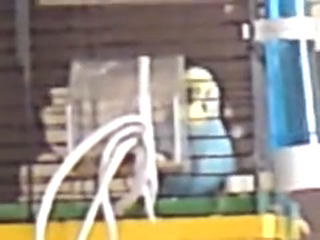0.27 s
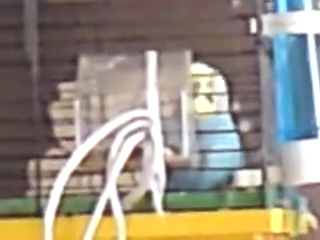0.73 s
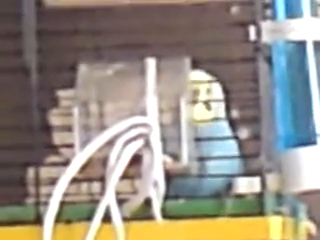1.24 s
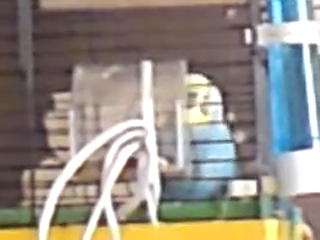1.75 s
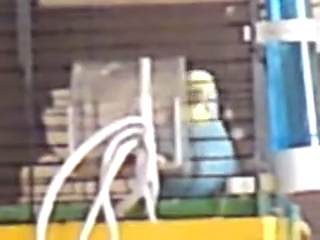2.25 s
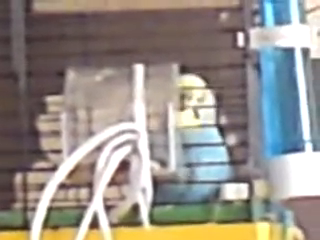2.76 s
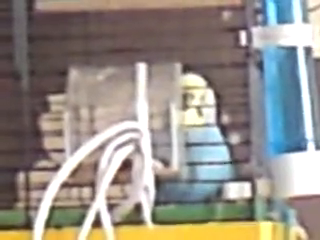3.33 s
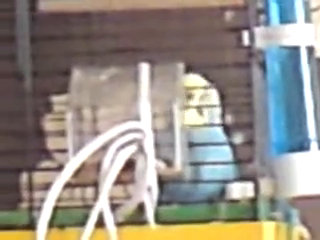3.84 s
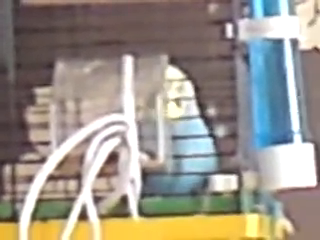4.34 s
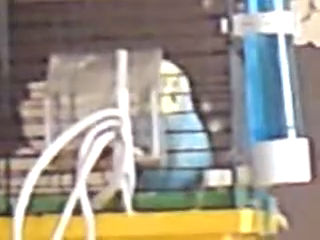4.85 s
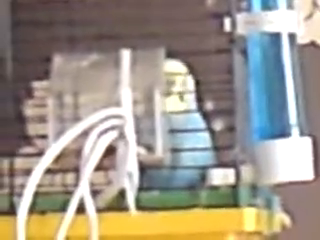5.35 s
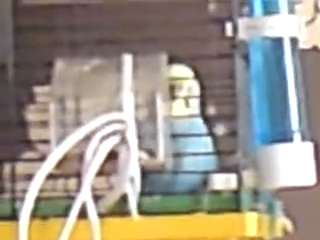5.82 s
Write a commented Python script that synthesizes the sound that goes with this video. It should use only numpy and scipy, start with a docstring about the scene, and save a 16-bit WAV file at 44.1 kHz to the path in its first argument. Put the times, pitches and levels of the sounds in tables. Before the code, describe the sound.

A caged budgerigar chatters indoors with harsh rasps, short rising chirps, buzzy warbles, beak clicks and one sharp whistle, over steady hiss.

```python
"""A harsh rasp is heard first, over low rumble and hiss; then a budgerigar chatters in a cage in a bare room.
Its rasps are noise pulses ringing throat and beak; its whistles, chirps and warbles are sums of harmonics;
its beak clicks, a scrape and a bump are shaped noise. Sparse decaying echoes blur every note, a small
microphone adds hiss, and a gain control lowers the level after loud calls, most after the loudest squawk."""
import sys
import numpy as np
from scipy import signal
from scipy.fft import rfft, irfft
from scipy.io import wavfile
from scipy.ndimage import uniform_filter1d

SR = 44100
rng = np.random.default_rng(int(sys.argv[2]) if len(sys.argv) > 2 else 0)


def wrap_up_sound(samples):
    """Save the sound to the file named by the first command line argument, as 16-bit audio."""
    columns = np.atleast_2d(samples).T
    # keep every value between -1 and 1, then stretch to whole-number steps
    tamed = np.clip(columns, -1, 1)
    steps = np.round(tamed * 32767).astype(np.int16)
    wavfile.write(sys.argv[1], SR, steps)


N = 268524  # samples in the scene

# Source levels are those before the direct path, echoes and gain control act.
# Spectrum of the microphone hiss: [f/Hz, density level/dB per Hz]
HISS_SPECTRUM = [(35, -27), (60, -3), (772, -12), (1350, -15.5), (1470, -15.5), (1880, -13.5), (2270, -17),
                 (3170, -19.5), (3440, -17), (4060, -18.5), (6550, -22.5), (8580, -34.5), (11200, -77),
                 (18900, -120)]
HISS_DB, HISS_DRIFT_DB, HISS_DRIFT_HZ = -48, 0.71, 6.1
# Low resonances of the room: [f/Hz, width/Hz, rms level/dB]
ROOM_HUMS = [(41.2, 6.6, -59.5), (260.5, 95, -58)]

# Rasps: [start t/s, rise t/s, fall t/s, peak level/dB, rise/dB, fall/dB (negative: grows),
# treble over body/dB, throat f/Hz, throat width/Hz, windpipe ring level/dB]
RASP_EVENTS = [(.02, 0.086, 0.033, -23.5, 6.5, 29, -9.5, 1530, 1690, -2),
               (.17, .04, 0.069, -48, 4, 4.5, 9, 1710, 1520, -1),
               (2.488, 0.013, 0.17, -39.5, 3, 8, -25, 1970, 500, -4),
               (2.63, 0.0188, 0.054, -35, 2, 10, -19, 2000, 903, -16),
               (2.74, 0.0075, 0.058, -36, 3, 14, -11, 2000, 1200, -8),
               (2.855, .065, .08, -20, 18.5, 14, 8.5, 2000, 1805, 5.5),
               (3.21, 0.0144, .022, -47.5, 9.5, 17.5, -14.5, 1580, 900, -17.5),
               (3.3, 0.085, 0.071, -47.5, 7, 7.5, -4.5, 1780, 1510, -3),
               (3.5, 0.067, 0.0645, -45, 3, 6, -17, 1900, 1200, 0.5),
               (4.17, 0.0067, 0.095, -38.5, 4.5, 25, -11, 1850, 1010, -12.5),
               (4.295, 0.016, 0.0366, -46, 11, 6, -20, 1460, 1010, -14),
               (4.685, 0.022, 0.052, -39, 3.5, 7.5, -24, 2020, 715, -24.5),
               (4.9, 0.014, 0.31, -49, 1, 4, -12.5, 1680, 1520, 2),
               (5.645, 0.008, 0.079, -41, 6, 3, -20, 2010, 500, -6),
               (5.775, .01, 0.055, -33, 0, 13.5, -26, 2117, 543, -10),
               (5.87, .006, 0.057, -36, 3, 17, -22, 1800, 1300, -12),
               (5.94, 0.035, .02, -43, 3, 14, -13, 1880, 1300, -18),
               (6.045, 0.0097, 0.044, -22, 18, -7, 0, 2200, 1790, 8.5)]
# Upper resonances of the open beak: [f/Hz, width/Hz, level/dB]
BEAK_RESONANCES = [(4650, 1600, -0.5), (5730, 920, -3), (7030, 870, -4)]
# Colour of a rasp leaving the cage: [f/Hz, level/dB]
CAGE_RESPONSE = [(450, -30), (900, -5), (1400, 0), (3500, 0), (3950, -4), (4300, 0), (8000, -4)]
WINDPIPE_HZ, WINDPIPE_WIDTH_HZ = 3050, 800
BRIGHTEN = 0.77  # treble dB gained per dB of effort
PULSES_PER_S = 1500  # mean rate of strong air pulses

# Pips: [start t/s, level/dB, mean f/Hz, length t/s]
PIP_EVENTS = [(0.486, -49, 3174, 0.026), (0.667, -42, 1747, 0.017), (0.916, -41.5, 3190, 0.016),
              (2.314, -36.5, 3243, 0.016), (4.078, -38, 3070, 0.0165), (4.094, -34.5, 3196, 0.028),
              (4.125, -30.5, 2316, 0.025), (4.496, -44, 3278, 0.012), (4.902, -53, 1609, 0.38),
              (5.12, -52, 3040, 0.061), (2.498, -39, 3830, 0.013), (2.535, -50, 3940, 0.012),
              (2.585, -34.5, 3747, 0.012), (2.62, -33.5, 3947, 0.0089), (2.614, -30.5, 2024, 0.014),
              (2.712, -34.5, 3172, 0.024), (2.732, -33, 4170, 0.0038), (2.74, -32.5, 2790, 0.014),
              (2.759, -35, 2014, 0.032), (2.794, -35.5, 2420, 0.031), (5.688, -42, 4000, 0.012),
              (5.745, -32.5, 3780, 0.006), (5.761, -34.5, 4000, 0.018), (5.824, -41.5, 1350, 0.015),
              (5.842, -37, 1560, 0.022), (5.873, -32, 3150, 0.02), (5.89, -35.5, 4220, 0.013),
              (5.904, -29, 2770, 0.015), (5.924, -34.5, 1990, 0.03), (5.954, -31.5, 2445, 0.029)]

# Rising chirps: [start t/s, climb t/s, top t/s, from f/Hz, top f/Hz, level before the tract/dB,
# second harmonic/dB, third harmonic/dB, hoarseness at the top/0-1]
RISE_EVENTS = [(.63, 0.1666, 0.043, 1295, 1828, -25.5, -4, -17.5, 0.18),
               (1.56, .095, .012, 1330, 1598, -43.5, 8.5, -12, 0.15),
               (1.655, 0.0452, 0.068, 1704, 1907, -31, -6.5, -19.5, 0.56),
               (2.008, 0.035, .008, 1390, 1578, -46.5, 11.5, -9.5, 0.12),
               (2.2, 0.091, 0.065, 1400, 1840, -31, -8, -17, .25),
               (3.72, .15, .05, 1320, 1851, -27.5, -10, -22, .18),
               (3.985, 0.077, .006, 1580, 2100, -33.5, -18, -13, 0.3),
               (5.3, 0.17, 0.063, 1347, 2120, -31.5, -10, -9.5, 0.34)]
# Response of windpipe and beak to whistled harmonics: [f/Hz, level/dB]
TRACT_RESPONSE = [(1300, -6.5), (1800, 0.5), (2600, -12), (3300, 4), (3800, -2.5), (4600, 8.5), (5500, -3),
                  (7000, -18), (9000, -40)]
SWELL_DB_PER_S, TOP_FADE_DB = 146.5, 14.5  # effort grows up the climb and fades at the top
TOP_SAG, CLIMB_LAG = .05, 1.3  # share by which the top pitch sags; exponent that delays the climb
OVERTONE_GROWTH = 0.12  # extra dB a harmonic gains per dB of effort and per step up
CLEAR_HOARSE, CLEAR_SLOW_HZ, CLEAR_DEPTH = .08, 270, .25  # start hoarseness; depth reached at the top

# Beak clicks: [start t/s, onset level/dB, lowest f/Hz, brightness/dB per octave]
CLICK_EVENTS = [(.67, -35.5, 710, -4), (1.836, -34, 1200, -1), (2.433, -35, 3060, -20.5),
                (2.652, -28, 596, -4), (2.739, -29, 604, -4.5), (4.301, -40, 3200, -26),
                (4.495, -52, 3200, -18), (5.597, -37, 2470, -10), (5.871, -25, 493, -3),
                (5.962, -28.5, 600, -4.5)]

# Spectrum of the scrape: [f/Hz, density level/dB per Hz]
SCRAPE_SPECTRUM = [(120, -49), (200, -26), (249, 0), (310, -12.5), (735, -1.5), (808, -8.5), (3260, -9.5),
                   (8500, -35.5), (11000, -52), (18700, -120)]
SCRAPE_S, SCRAPE_RISE_S, SCRAPE_FALL_S = 1.07, 0.12, 0.168
SCRAPE_DB, SCRAPE_SWELL_DB = -40.5, 18
# Spectrum of the bump: [f/Hz, density level/dB per Hz]
BUMP_SPECTRUM = [(71, -34), (150, -5.5), (263, 0.5), (498, -15), (703, -11), (1080, -17.5), (1270, -10),
                 (1400, -15), (3990, -34.5), (7800, -67), (13200, -120)]
BUMP_S, BUMP_DB, BUMP_RISE_S, BUMP_T60_S = 1.343, -26.5, .002, 0.14

# Sharp calls: [start t/s, length t/s, settled f/Hz, peak level/dB]
SHARP_EVENTS = [(1.845, 0.077, 3282, -19.5), (4.3, 0.073, 3340, -32)]
SHARP_RISE_S, SHARP_T60_S, SHARP_SECOND_DB = .014, 0.13, -27.5
SHARP_BEND = .08  # the pitch starts this share high
SHARP_HOARSE, SHARP_SLOW_HZ, SHARP_DEPTH = .28, 350, .3

# Buzzy warble notes: [start t/s, rise t/s, fall t/s, from f/Hz, glide target f/Hz, glide t/s, level/dB,
# fade/dB, second harmonic/dB, slower vibration f/Hz, hoarseness/0-1]
WARBLE_EVENTS = [(2.048, 0.051, 0.09, 1932, 2679, 0.018, -29, 3.5, -30.5, 350, 0.38),
                 (2.435, 0.013, 0.1, 3600, 2680, .018, -33.5, 6, -29, 680, 0.5),
                 (2.565, .006, 0.048, 3000, 3030, 0.028, -41, 5, -40.5, 800, 0.58),
                 (4.055, 0.034, 0.012, 2080, 3183, 0.045, -39.5, 2.5, -2, 600, 0.5),
                 (4.105, 0.0048, 0.092, 2622, 2152, .03, -40, 18.5, 8, 900, 0.21),
                 (5.6, 0.017, 0.096, 3400, 2735, .012, -29.5, 15, -32, 680, 0.52),
                 (5.725, .006, 0.049, 3050, 3050, 0.029, -36, 10.5, -36.5, 850, 0.51),
                 (5.781, .006, .055, 1993, 2023, 0.028, -47.5, -2, -9, 850, 0.52)]
BUZZ_ONSET_DB, BUZZ_SAG_HZ_PER_S, BUZZ_DEPTH = 9, 2000, .55
BUZZ_THIRD_DB = -22.5  # third harmonic relative to the second
THROB_HZ, THROB_DB = 110, 3

# Reverberation of the bare room: [f/Hz, t60/s]
ROOM_DECAY = [(300, 0.4), (1500, 0.26), (3500, 0.29), (7000, 0.3)]
DIRECT_DB, ECHO_DB = -1, 1.0
ECHO_SPACING = 20  # samples, one echo at a random place in each

GAIN_THRESHOLD_DB, GAIN_SHARE, RECOVERY_DB_PER_S = -22.5, 0.63, 15.2  # share of the excess removed
SOFT_HZ, EDGE_HZ = 8300, 8780  # gentle and steep band limits


def gain_of(db):
    """Amplitude ratio of a level: twenty decibels are a factor of ten."""
    return 10 ** (np.asarray(db) / 20)


def evened(x):
    """Normalisation of mean power: rms 1."""
    return x / np.sqrt(np.mean(x ** 2) + 1e-20)


def read(points, hz):
    """Interpolation of a spectrum along logarithmic frequency."""
    f, value = np.transpose(points)
    return np.interp(np.log(hz + 1), np.log(f + 1), value)


def add(mix, s, sound):
    """Superposition: a sound starting at s seconds adds to the mix."""
    part = mix[max(round(s * SR), 0):][:len(sound)]
    part += sound[:len(part)]


def coloured(x, points):
    """Spectral filtering: each frequency is weighted by the given spectrum, then rms 1."""
    hz = np.fft.rfftfreq(len(x), 1 / SR)
    return evened(irfft(rfft(x) * gain_of(read(points, hz)), len(x)))


def resonate(x, hz, width):
    """Resonance by heterodyning: hz shifts down to zero, is smoothed twice and shifts back."""
    turn = np.exp(2j * np.pi * np.cumsum(hz * np.ones(len(x))) / SR)
    r = np.exp(-np.pi * width / SR)
    smooth = signal.lfilter([(1 - r) ** 2], [1, -2 * r, r * r], x / turn)
    return 2 * (turn * smooth).real


def wobble(count, hz):
    """Low-passed noise: a smooth random variation mostly slower than hz, rms 1."""
    settle = 999  # samples dropped while the filter settles
    return evened(resonate(rng.standard_normal(count + settle), 0, hz)[settle:])


def swell(rise, fall, rise_db, fall_db):
    """Exponential growth and decay: time and a level in dB, linear up to 0 and away again."""
    t = np.arange(0, rise + fall, 1 / SR)
    return t, np.interp(t, [0, rise, rise + fall], [-rise_db, 0, -fall_db])


def chirp(hz, levels_db, hoarse, slow_hz, depth):
    """Modulation of the syrinx: a slower vibration gives harmonics side tones; hoarse notes flutter."""
    count = len(hz)
    turns = np.cumsum(hz * (1 + 0.0657 * hoarse * wobble(count, 350))) / SR
    slow_turns = np.cumsum(slow_hz * (1 + 0.3026 * wobble(count, 120))) / SR
    flutter = 1 + 0.41 * hoarse * wobble(count, 240)
    slow_vibration = 1 + depth * np.sin(2 * np.pi * slow_turns)
    tone = sum(gain_of(db) * np.sin(2 * np.pi * k * turns) for k, db in enumerate(levels_db, 1))
    return np.sqrt(2) * tone * flutter * slow_vibration * signal.windows.tukey(count, .12)


def background():
    """Stationary noise: narrow bands of room rumble beneath broadband, gently uneven hiss."""
    hums = np.zeros(N)
    for hz, width, db in ROOM_HUMS:
        hums += gain_of(db) * evened(resonate(rng.standard_normal(N), hz, width))
    hiss_db = HISS_DB + HISS_DRIFT_DB * wobble(N, HISS_DRIFT_HZ)
    return gain_of(hiss_db) * coloured(rng.standard_normal(N), HISS_SPECTRUM) + hums


def rasp(rise_s, fall_s, db, rise_db, fall_db, treble_db, throat_hz, throat_width, windpipe_db):
    """Source and filter: irregular air pulses ring a throat resonance, the windpipe and the open beak."""
    t, effort_db = swell(rise_s, fall_s, rise_db, fall_db)
    strong = rng.random(len(t)) < PULSES_PER_S / SR
    pulses = rng.standard_normal(len(t)) * (0.35 + strong * 2.9)
    windpipe = gain_of(windpipe_db) * resonate(pulses, WINDPIPE_HZ, WINDPIPE_WIDTH_HZ)
    body = resonate(pulses, throat_hz, throat_width) - windpipe
    beak = np.zeros(len(t))
    for k, (hz, width, beak_db) in enumerate(BEAK_RESONANCES):
        beak += (-1) ** k * gain_of(beak_db) * resonate(pulses, hz, width)  # alternating phase
    treble = gain_of(treble_db + BRIGHTEN * effort_db) * coloured(beak, CAGE_RESPONSE)
    voice = coloured(body, CAGE_RESPONSE) + treble
    return gain_of(db + effort_db) * voice * signal.windows.tukey(len(t), .2)


def pip(db, hz, length):
    """Frequency modulation: a short whistle falls slightly and wavers at random."""
    u = np.arange(0, length, 1 / SR) / length
    falling_hz = hz * (1 - 0.017 * (u - .5))
    turns = np.cumsum(falling_hz * (1 + 0.017 * wobble(len(u), 290))) / SR
    return gain_of(db) * np.sin(2 * np.pi * turns) * signal.windows.tukey(len(u), .4)


def rise(climb, top, from_hz, top_hz, db, second_db, third_db, top_hoarse):
    """Formant filtering: harmonics climb in an S-bend through the tract, growing louder and hoarser."""
    t, effort_db = swell(climb, top, SWELL_DB_PER_S * climb, TOP_FADE_DB)
    up = np.sin(np.pi / 2 * np.minimum(t / climb, 1) ** CLIMB_LAG) ** 2
    sag = 1 - TOP_SAG * np.maximum(t - climb, 0) / top
    hz = (from_hz + (top_hz - from_hz) * up) * sag
    levels_db = []
    for k, own_db in enumerate((0, second_db, third_db)):
        grown_db = (1 + OVERTONE_GROWTH * k) * effort_db
        levels_db.append(db + grown_db + own_db + read(TRACT_RESPONSE, (k + 1) * hz))
    hoarse = CLEAR_HOARSE + (top_hoarse - CLEAR_HOARSE) * up ** 2
    return chirp(hz, levels_db, hoarse, CLEAR_SLOW_HZ, CLEAR_DEPTH * up)


def click(db, low_hz, tilt_db):
    """Impulsive excitation: the snap of the beak is a decaying burst of band-limited noise."""
    t = np.arange(900) / SR
    tilt_at_top_db = tilt_db * np.log2(6500 / low_hz)
    spectrum = [(0.2 * low_hz, -30), (low_hz, -3), (np.sqrt(2) * low_hz, 0),
                (6500, tilt_at_top_db), (8500, -30)]
    decay = gain_of(db - 60 * t / 0.037)  # t60/s
    attack = 1 - np.exp(-t / 0.00077)
    return decay * attack * coloured(rng.standard_normal(900), spectrum)


def scrape():
    """Friction noise: a soft coloured noise swells and sinks again."""
    t, effort_db = swell(SCRAPE_RISE_S, SCRAPE_FALL_S, SCRAPE_SWELL_DB, SCRAPE_SWELL_DB)
    return gain_of(SCRAPE_DB + effort_db) * coloured(rng.standard_normal(len(t)), SCRAPE_SPECTRUM)


def bump():
    """Damped impact: a dull knock starts quickly and decays exponentially."""
    t = np.arange(6000) / SR
    decay = gain_of(BUMP_DB - 60 * t / BUMP_T60_S)
    attack = np.minimum(t / BUMP_RISE_S, 1)
    return decay * attack * coloured(rng.standard_normal(6000), BUMP_SPECTRUM)


def sharp_call(length, hz, db):
    """Pitch relaxation: a quick high whistle starts sharp, settles exponentially and dies away."""
    fall = length - SHARP_RISE_S
    t, effort_db = swell(SHARP_RISE_S, fall, 20, 60 * fall / SHARP_T60_S)
    bend = 1 + SHARP_BEND * np.exp(-t / SHARP_RISE_S)
    first_db = db + effort_db
    levels_db = [first_db, first_db + SHARP_SECOND_DB]
    return chirp(hz * bend, levels_db, SHARP_HOARSE, SHARP_SLOW_HZ, SHARP_DEPTH)


def warble(rise_s, fall_s, from_hz, to_hz, glide, db, fade_db, second_db, slow_hz, hoarse):
    """Amplitude modulation: a buzzy note throbs unevenly while it glides exponentially and sags."""
    t, effort_db = swell(rise_s, fall_s, BUZZ_ONSET_DB, fade_db)
    hz = to_hz + (from_hz - to_hz) * np.exp(-t / glide) - BUZZ_SAG_HZ_PER_S * t
    first_db = db + effort_db + THROB_DB * wobble(len(t), THROB_HZ)
    levels_db = [first_db, first_db + second_db, first_db + second_db + BUZZ_THIRD_DB]
    return chirp(hz, levels_db, hoarse, slow_hz, BUZZ_DEPTH)


def bird():
    """Superposition of all the calls and beak clicks, without echoes."""
    out = np.zeros(N)
    voices = [(RASP_EVENTS, rasp), (PIP_EVENTS, pip), (RISE_EVENTS, rise), (CLICK_EVENTS, click),
              (SHARP_EVENTS, sharp_call), (WARBLE_EVENTS, warble)]
    for events, voice in voices:
        for s, *settings in events:
            add(out, s, voice(*settings))
    return out


def room(x):
    """Reverberation by convolution: sparse echoes of random sign, each band with its own decay time."""
    taps = np.zeros(SR // 2)
    at = np.arange(60, len(taps) - ECHO_SPACING, ECHO_SPACING)
    taps[at + rng.integers(0, ECHO_SPACING, len(at))] = rng.choice([-1., 1.], len(at))
    hz, t, bands = signal.stft(taps, SR, nperseg=256)
    decay = gain_of(-60 * t / read(ROOM_DECAY, hz)[:, None])
    tail = signal.istft(bands * decay, SR, nperseg=256)[1]
    return signal.fftconvolve(x, tail / np.linalg.norm(tail))[:N]


def scene():
    """Superposition of direct sound, reverberation and background."""
    near = bird()
    add(near, SCRAPE_S, scrape())
    add(near, BUMP_S, bump())
    return (gain_of(DIRECT_DB) * near + gain_of(ECHO_DB) * room(near) + background())[None]


def record(dry):
    """Automatic gain control: gain falls on loud calls and recovers slowly; then the band is limited."""
    power_db = 10 * np.log10(abs(uniform_filter1d(dry[0] ** 2, 1300)) + 1e-12)
    recovery_db = np.arange(N) * RECOVERY_DB_PER_S / SR
    held_db = np.maximum.accumulate(power_db + recovery_db) - recovery_db  # peaks sink steadily
    over_db = np.maximum(held_db - GAIN_THRESHOLD_DB, 0)
    # The averaging window lies mostly in the past, so the gain lags the call.
    ducked = dry / gain_of(GAIN_SHARE * uniform_filter1d(over_db, 1500, origin=700))
    soft = signal.sosfilt(signal.butter(N=4, Wn=SOFT_HZ, fs=SR, output="sos"), ducked)
    edge = signal.firwin(511, EDGE_HZ, window=("kaiser", 9), fs=SR)
    return signal.oaconvolve(soft, edge[None], "same")


dry = scene()
out = record(dry)
wrap_up_sound(out)
```